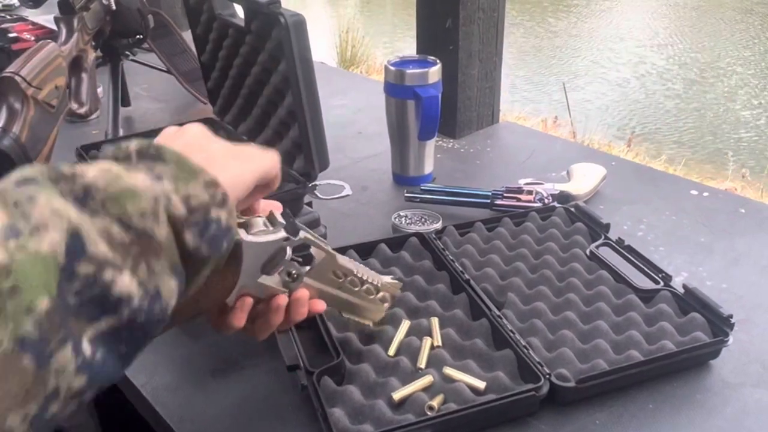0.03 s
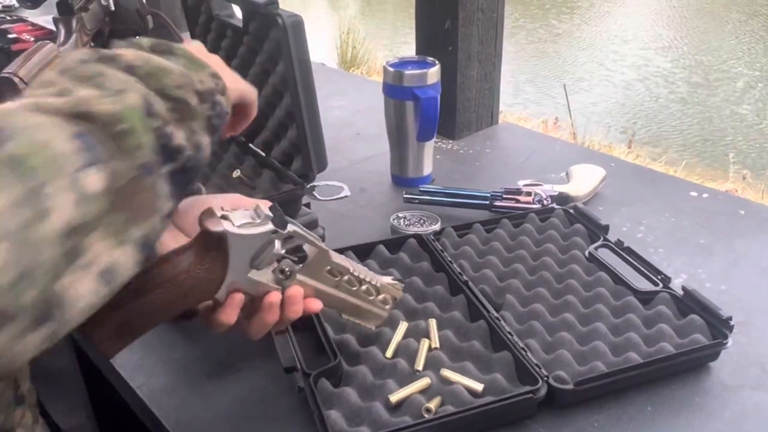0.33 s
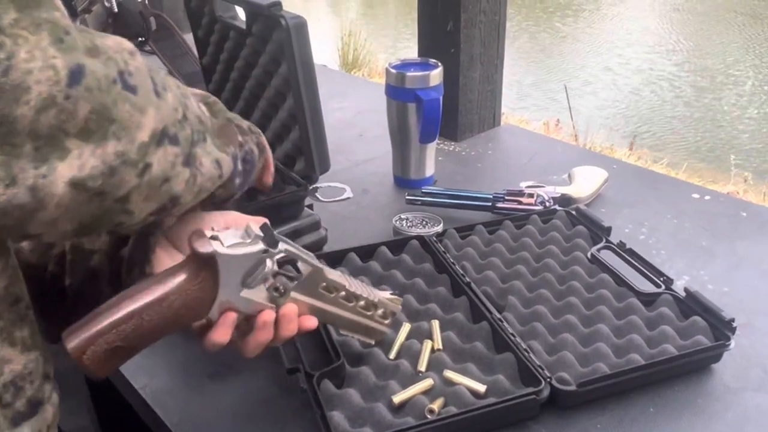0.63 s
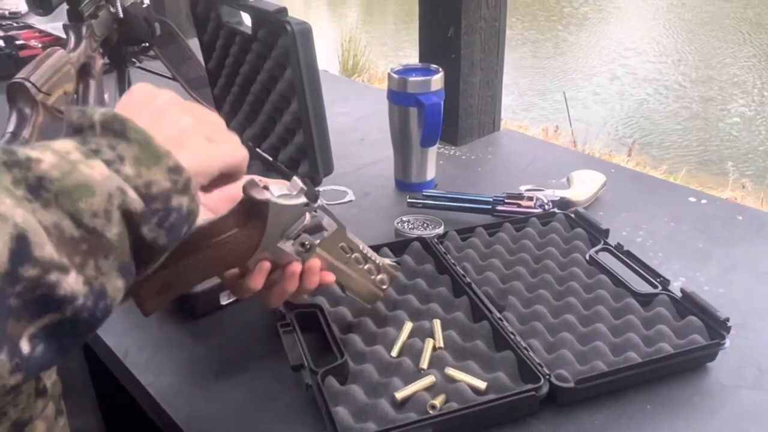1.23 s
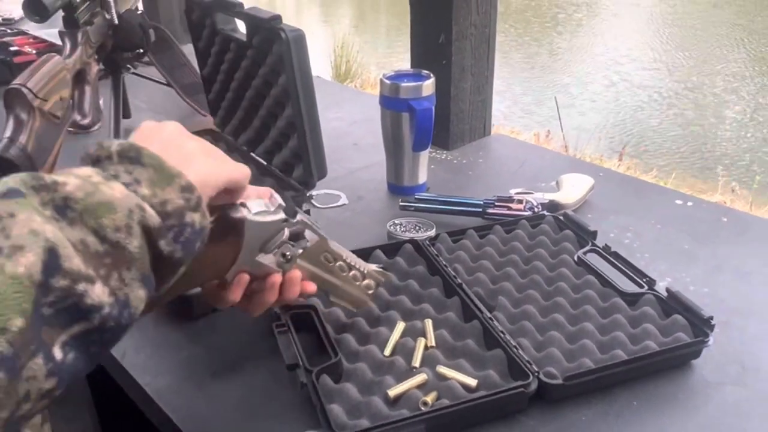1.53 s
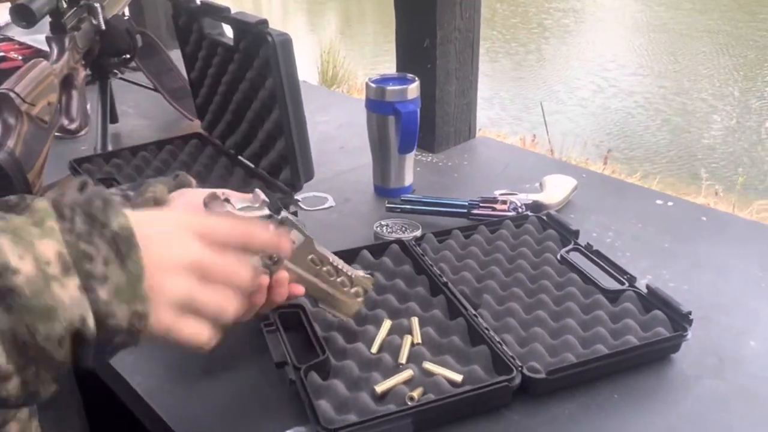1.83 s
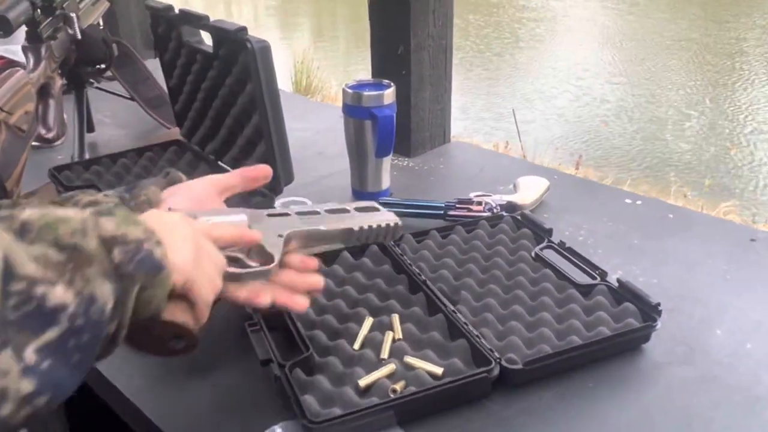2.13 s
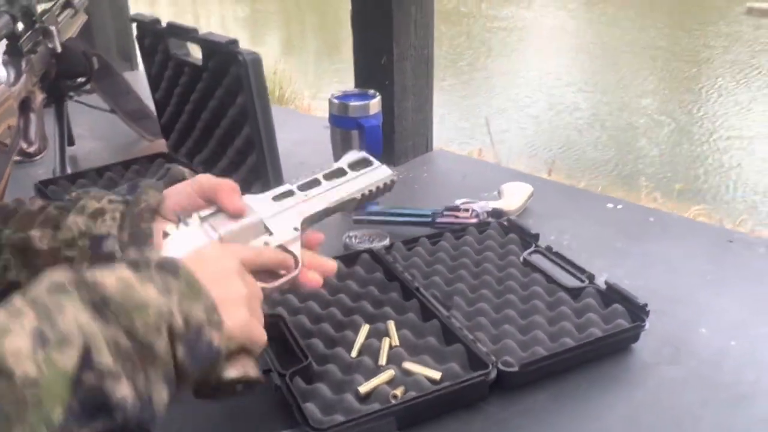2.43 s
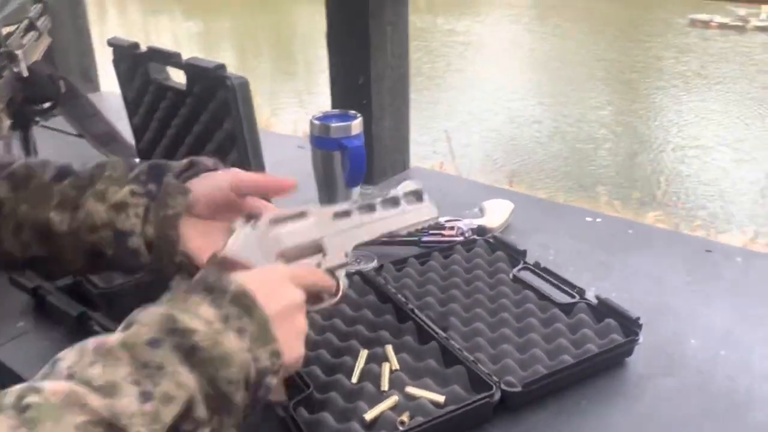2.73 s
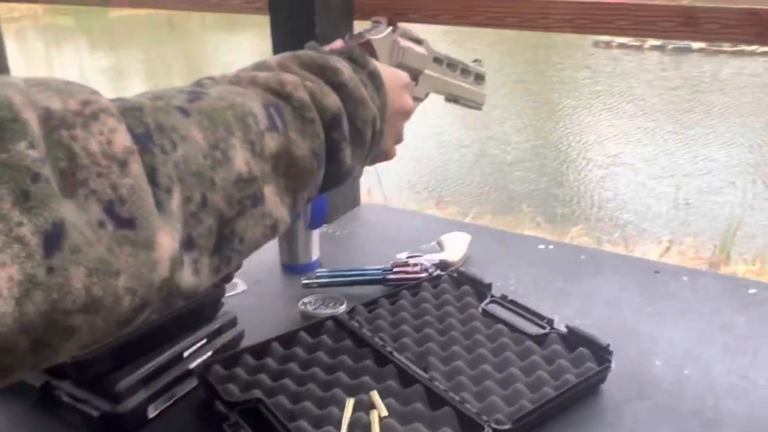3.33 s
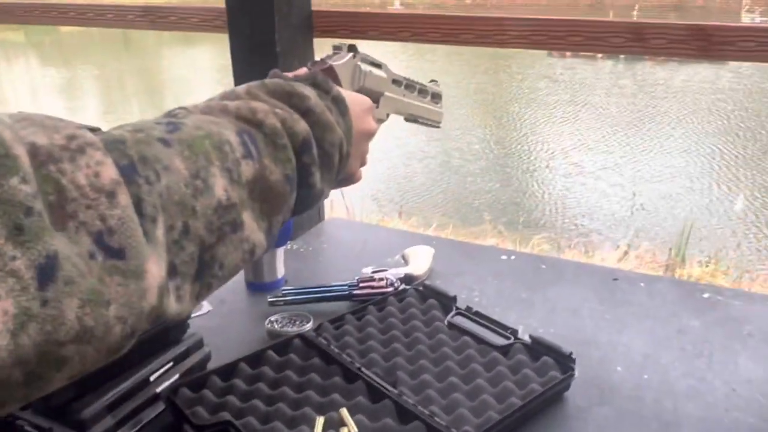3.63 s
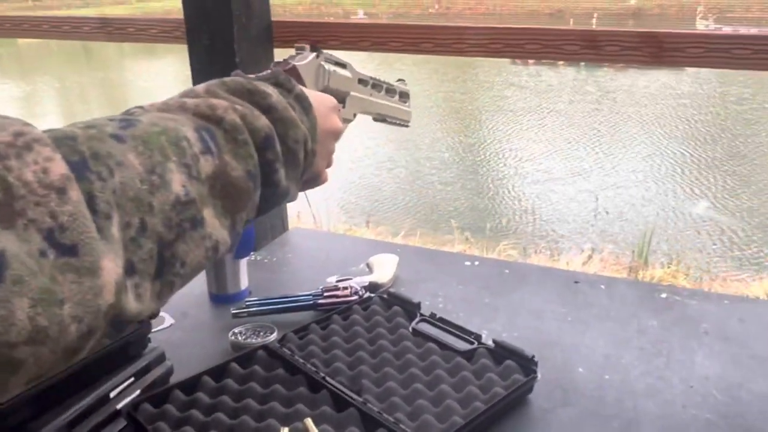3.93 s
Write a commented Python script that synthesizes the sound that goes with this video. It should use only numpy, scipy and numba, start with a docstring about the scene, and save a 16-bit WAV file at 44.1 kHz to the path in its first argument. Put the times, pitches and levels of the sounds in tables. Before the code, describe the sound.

A revolver-style air pistol is loaded, snapped shut, cocked and fired twice outdoors.

```python
"""Air pistol under a shelter

A revolver-style air pistol is loaded, snapped shut, cocked and fired twice at a bench under a roof by a pond.
Steel impacts excite the damped modes of shells and frame; each shot is a burst of gas with a low thump.
The shelter reverberates, sleeves rustle by friction, air rumbles faintly, and a limiter holds the shots down."""
import sys
import numpy as np
from scipy import signal
from scipy.fft import rfft, irfft, next_fast_len
from scipy.io import wavfile
from scipy.ndimage import uniform_filter1d, minimum_filter1d
from numba import njit

SR = 44100
rng = np.random.default_rng(int(sys.argv[2]) if len(sys.argv) > 2 else 0)


def wav_record(signal):
    """Record a signal, one row per channel, as 16-bit PCM in the file named by sys.argv[1]."""
    frames = np.transpose(np.atleast_2d(signal))
    bounded = np.clip(frames, -1, 1)
    # unit amplitude maps onto the largest positive 16-bit level
    quanta = np.round(bounded * 32767).astype(np.int16)
    wavfile.write(sys.argv[1], SR, quanta)


N = 176400
CONTACT_RISE_S, CONTACT_FALL_S = 0.00031, 0.0012
# sliding of sleeve and hand: t/s, level/dB, rise/s, decay/s
SLIDES = [(.66, -60, 0.0049, 0.13), (.8, -66, 0.096, 0.08), (1.62, -59.5, 0.026, 0.068),
          (1.8, -60.5, 0.11, 0.07), (2.92, -67.5, 0.048, 0.19)]
# shots: t/s, gas level/dB, burst length/s, gas bass/dB, thump level/dB, thump start f/Hz, lead-in swell/s
DISCHARGES = [(3.5531, -5.5, 0.00408, -0.5, -10.5, 412, 0.02),
              (3.8756, -2.5, 0.0014, -2.5, -23.5, 262, .004)]


def undb(db):
    """Amplitude ratio of a level in decibels."""
    return 10 ** (np.asarray(db) / 20)


def unit(x):
    """Normalisation to an rms of 1."""
    return x / np.sqrt(np.mean(x ** 2))


def colour(x, points):
    """Minimum-phase filter through (f/Hz, level/dB) points, made by folding the cepstrum."""
    size = next_fast_len(x.shape[-1] + 2048, True)
    size += size % 2
    hz, db = np.array(points, float).T
    log_hz = np.log(np.fft.rfftfreq(size, 1 / SR) + 1)
    cepstrum = irfft(np.log(undb(np.interp(log_hz, np.log(hz), db))))
    cepstrum[1:size // 2] *= 2
    cepstrum[size // 2 + 1:] = 0
    return irfft(rfft(x, size) * np.exp(rfft(cepstrum)))[..., :x.shape[-1]]


def envelope(t, rise, hold, fall):
    """Linear rise, hold and exponential decay."""
    return np.clip(t / rise, 0, 1) * np.exp(-np.maximum(t - rise - hold, 0) / fall)


def burst(shape):
    """Two uncorrelated noise transients, whitened under an envelope."""
    x = rng.standard_normal((2, len(shape))) * shape
    for _ in range(2):
        x = irfft(np.exp(1j * np.angle(rfft(x))), len(shape)) * np.sqrt(shape)
    return unit(x) * np.sqrt(np.mean(shape ** 2))


def add(out, x, at):
    """Superposition of x on out, starting at a time in seconds."""
    i = max(int(at * SR), 0)
    out[..., i:i + x.shape[-1]] += x[..., :N - i]


def spread(pair, width):
    """Sum and difference turn mid and side into left and right."""
    return pair[0] + width * pair[1] * np.array([[1], [-1]])


def walk(rate_hz):
    """Random modulation of rms 1, interpolated between independent values."""
    step = int(SR / rate_hz)
    stairs = np.repeat(rng.standard_normal(N // step + 1), step)
    return unit(uniform_filter1d(stairs, step)[:N])


def effort(rows):
    """Amplitude envelope of the hand's movements, a sum of strokes."""
    t = np.arange(N) / SR
    return sum(undb(db) * envelope(t - at, rise, 0, fall) for at, db, rise, fall in rows)


def friction(rows, tone, grain_db=2):
    """Sliding friction: noise whose amplitude follows the effort, with a random grain."""
    noise = unit(colour(rng.standard_normal((2, N)), tone))
    return noise * effort(rows) * undb(grain_db * walk(110))


def open_air(level_db=-46.5, swell_db=0.5):
    """Ambient noise: a gently swelling rumble, less coherent between the channels towards the treble."""
    # spectrum of the air: f/Hz, level/dB
    spectrum = [(18, -17), (45, -3.5), (85, 1), (200, -9), (450, -16), (1200, -31), (4000, -49.5),
                (10000, -60.5), (12000, -76)]
    # side relative to mid: f/Hz, level/dB
    width = [(150, -14), (1200, -1.5)]
    mid, side = unit(colour(rng.standard_normal((2, N)), spectrum))
    return spread([mid, colour(side, width)], 1) * undb(level_db + swell_db * walk(13))


def handling():
    """Friction of handling makes a low rumble, in mono."""
    # movements: t/s, level/dB, rise/s, decay/s
    movements = [(-.03, -41.5, 0.029, 0.18), (1.62, -43.5, 0.07, 0.17)]
    # spectrum of the rumble: f/Hz, level/dB
    spectrum = [(25, -21.5), (70, 0.5), (150, -22.5), (2000, -49)]
    return friction(movements, spectrum)[0]


def sleeves():
    """Friction of cloth gives broadband noise with a narrow scraping peak."""
    # spectrum of the cloth: f/Hz, level/dB
    spectrum = [(300, -6), (1500, 10.5), (4350, 3.5), (4650, 9.5), (4950, 2), (10000, 0.5), (11500, -15.5)]
    return friction(SLIDES, spectrum)


def shelter(x, low_t60=0.47, mid_t60=0.32, top_t60=0.45, far_t60=0.73, build_s=0.0064):
    """Reverberation by convolution: roof reflection, scatter from posts and benches, a faint far tail."""
    # spectrum of the reverberation: f/Hz, level/dB
    spectrum = [(100, 4), (500, -12), (2500, -3), (5500, -3), (10000, -7), (12000, -16.5)]
    t = np.arange(SR) / SR
    fade = lambda t60: np.exp(-np.log(1000) * t / t60)
    noise = rng.standard_normal((2, SR))
    low, below_top = (signal.sosfilt(signal.butter(2, hz, fs=SR, output="sos"), noise)
                      for hz in (900, 10000))
    near = low * fade(low_t60) + (below_top - low) * fade(mid_t60) + (noise - below_top) * fade(top_t60)
    far = colour(rng.standard_normal((2, SR)), [(1500, -3.5), (15000, -11.5)]) * fade(far_t60)
    diffuse = (unit(near) + undb(-8.5) * unit(far)) * (1 - np.exp(-(t / build_s) ** 2))
    roof = undb(-9) * unit(burst(envelope(t - 0.015, 0.00079, 0, 0.0026)))  # arrives after 15 ms
    response = colour(diffuse + roof, spectrum) / np.sqrt(SR)
    return signal.fftconvolve(x[:1], response, axes=1)[:, :N]


def rattles(ticks_per_s=20, band_hz=(2800, 6500), relative_db=-15):
    """Loose parts tick as a Poisson process, as strongly as the hand moves."""
    ticks = (rng.random(N) < ticks_per_s / SR) * rng.random(N)
    decays = signal.lfilter([1], [1, -np.exp(-1 / (2 * CONTACT_FALL_S * SR))], ticks)
    bandpass = signal.butter(2, band_hz, "band", fs=SR, output="sos")
    steel = signal.sosfilt(bandpass, rng.standard_normal((2, N)) * decays)
    return undb(relative_db) * unit(steel) * effort(SLIDES)


def uneven(x, step_hz=380, above_hz=900):
    """Each blow excites the gun's broad resonances unequally: a random spectral ripple."""
    hz = np.arange(2, 44) * step_hz
    db = 3 * np.clip(rng.standard_normal(len(hz)), -1.5, 1.5)
    ripple = (db - uniform_filter1d(db, size=5)) * (hz > above_hz)
    return colour(x, np.column_stack([hz, ripple]))


def contacts(events, modes, detune=0.0056, ring_offset_db=-19.5):
    """Impact excitation: metal chatters, dies in a damped clatter and leaves close mode pairs beating."""
    out, t = np.zeros((2, N)), np.arange(SR // 3) / SR
    # bass of a contact: f/Hz, level/dB
    bass = [(450, -21.5)]
    hz, mode_db, t60 = np.array(modes + modes).T[:, :, None]
    for at, db, body_db, edge_db, top_db, ring_db, length in events:
        pitch = hz * (1 + detune * rng.standard_normal(hz.shape))
        poles = 2j * np.pi * pitch - np.log(1000) / t60
        rings = undb(mode_db + ring_db + ring_offset_db) * np.exp(poles * t)
        phasors = np.exp(2j * np.pi * rng.random((2, len(hz))))
        hit = (phasors @ rings).imag * np.minimum(t / CONTACT_RISE_S, 1)
        chatter = burst(envelope(t[:SR // 20], CONTACT_RISE_S, length, CONTACT_FALL_S))
        clatter = undb(-10) * burst(envelope(t[:SR // 10], length, 0, fall=0.011))
        add(hit, chatter, 0)
        add(hit, clatter, 0)
        tone = bass + [(1100, body_db), (1700, body_db), (2500, body_db - 2.5), (3200, 0), (6000, 0),
                       (8500, edge_db), (11500, (edge_db + top_db) / 2 - 3), (15000, top_db)]
        add(out, undb(db) * colour(uneven(hit), tone), at)
    return out


def shells():
    """Shells set into the cylinder ring in free vibration after each impact."""
    # impacts: t/s, level/dB, body/dB, edge/dB, top/dB, ring/dB, length/s
    impacts = [(.069, -31.5, -21, -3.5, 1, -9, .004), (.094, -40, -11, -20, -24, -10, 0.01),
               (.1295, -29, 1.5, 0, 6, -1.5, 0.0029), (.1805, -38, -0.5, 2, -22, -25, 0.0033),
               (1.437, -38, -0.5, -13, -12.5, 4, .009), (1.560, -47, 5, -16.5, -24, -7.5, .0015),
               (1.6125, -35.5, -7, -2, -21, -12, .002), (1.7145, -32, 5, 6, -6, -1, 0.0016)]
    # modes of the shells: f/Hz, level/dB, T60/s
    modes = [(3730, -4, 0.23), (3800, -1, 0.21), (5400, -13.5, .17), (6335, -12, .16), (7870, 8.5, 0.13),
             (9990, 1, 0.14), (15120, 3.5, .2)]
    return contacts(impacts, modes)


def lockwork():
    """Impacts of cylinder, latch, trigger and hammer excite the gun's natural modes."""
    # impacts: t/s, level/dB, body/dB, edge/dB, top/dB, ring/dB, length/s
    impacts = [(2.033, -30.5, -1.5, -13, -21, -7, 0.0024), (2.0543, -19, -1.5, -2, -8, -5, 0.0066),
               (2.070, -19, -7, 11.5, -5, -5, 0.00083), (2.081, -16.5, -15, -3, -15, -6, 0.0013),
               (2.1028, -6.5, -3.5, -3, -8, 1.5, 0.0023), (2.436, -39.5, -6, -29, -23, -17, 0.00048),
               (2.4800, -26, -10, 4.5, 1.5, -6, 0.0045), (2.4838, -26, -5, -25, -19, -5, 0.0052),
               (2.636, -44, 5, -3, -21, -18, 0.002), (2.657, -46.5, 4, 7, -21.5, -20, 0.002),
               (3.4715, -29, -6, 7.5, 4, -7, 0.0037), (3.4908, -22, -6.5, -2, 1.5, -13, 0.0063),
               (3.501, -28.5, -8, -2, -6, -32, 0.014), (3.8062, -25, -4, 8, 10, -10, 0.0014),
               (3.8268, -20, -5.5, 1.5, -2, -13, 0.007)]
    # modes of cylinder and frame: f/Hz, level/dB, T60/s
    modes = [(1583, -2.5, 0.14), (1646, 6, 0.06), (3850, -17, .23), (4950, -13.5, 0.19), (7960, -2, 0.15),
             (8560, -6.5, 0.12), (9980, 5, 0.087), (10280, 10, 0.093), (15120, -8, .18)]
    return contacts(impacts, modes)


def thumps(end_hz=55.3, glide_s=0.00582, lag_s=0.00581, drone_hz=47.1):
    """Damped sinusoids of falling pitch mark a knock and the shots; a drone follows the first shot."""
    # dull knock of the hand: t/s, level/dB, start f/Hz
    knocks = [(0.399, -25, 174)]
    shot_pulses = [(at + lag_s, db, hz) for at, _, _, _, db, hz, _ in DISCHARGES]
    out, t = np.zeros(N), np.arange(N) / SR
    pulse = envelope(t, rise=0.0032, hold=0.0116, fall=0.0063)
    for at, db, start_hz in knocks + shot_pulses:
        hz = end_hz + (start_hz - end_hz) * np.exp(-t / glide_s)
        add(out, undb(db) * np.sin(2 * np.pi * np.cumsum(hz) / SR) * pulse, at)
    drone = np.sin(2 * np.pi * drone_hz * t) * envelope(t, rise=0.13, hold=0.13, fall=0.043)
    add(out, undb(-28.5) * drone, at=3.58)
    return out


def shots(rise_s=0.00046, fall_s=0.0023, swell_db=-14.5):
    """A faint noise swells just before each shot, then gas expands from the valve as a noise transient."""
    # spectrum of the discharge: f/Hz, level/dB
    spectrum = [(60, 2), (300, 5.5), (480, 3.5), (700, 8), (1150, -4.5), (1560, 4), (2700, -3.5),
                (3050, -3.5), (3750, -3), (5400, 4), (6900, -0.5), (8400, 2.5), (10500, -3.5),
                (15500, -6.5)]
    out, t = np.zeros((2, N)), np.arange(SR // 10) / SR
    for at, db, length, bass_db, _, _, swell_s in DISCHARGES:
        gas = uneven(burst(envelope(t, rise_s, length, fall_s)))
        add(out, undb(db) * colour(gas, [(650, bass_db), (1200, 0)]), at)
        swell = burst(envelope(t, swell_s, 0, fall_s))
        add(out, undb(db + swell_db) * swell, at - swell_s)
    return colour(out, spectrum)


def scene():
    """Direct sound of the gun, close and a little to the left, adds to the diffuse field and open air."""
    # side relative to mid in the diffuse field: f/Hz, level/dB
    diffuse_width = [(250, -8), (1200, 0), (6500, -1.5), (8500, -23)]
    steel = shells() + lockwork() + rattles()
    gas = shots()
    direct = spread(steel + gas, width=0.25)
    mid, side = shelter(undb(-5) * steel + undb(1) * gas) + sleeves()
    diffuse = spread([mid, colour(side, diffuse_width)], width=0.86)
    balance = undb([[1], [-1]])
    return (direct + diffuse) * balance + thumps() + handling() + open_air()


def ports(x):
    """Treble resonance of the two microphone ports shifts the phase between left and right."""
    # lead of the left port over the right: f/Hz, phase/rad
    phase_lead = [(100, 0), (1300, .8), (2800, 1), (8300, .1), (11800, -6.2), (12600, -6.9), (14900, -12.4)]
    # response of the ports: f/Hz, level/dB
    response = [(9400, -3.5), (10250, -4), (11300, -8), (13000, -6.5), (14500, -6.5), (15500, 4.5),
                (16200, -16)]
    size = 2 * N
    lead = np.interp(np.fft.rfftfreq(size, 1 / SR), *np.array(phase_lead).T)
    turn = np.exp(1j * np.array([lead, 0 * lead]))
    return irfft(rfft(colour(x, response), size) * turn)[:, :N]


@njit
def follow(size, keep):
    """Peak detection with instant attack and exponential release."""
    out, peak = np.empty(len(size)), 0.
    for i in range(len(size)):
        peak = max(size[i], peak * keep)
        out[i] = peak
    return out


def record(dry, limit_db=-2.66, release_s=0.0093, cutoff_hz=16100):
    """Peak limiting and low-pass filtering follow the microphone ports."""
    x = ports(dry)
    peak = follow(np.abs(x).max(axis=0), np.exp(-1 / (release_s * SR)))
    gain = np.minimum(1, undb(limit_db) / (peak + 1e-9))
    gain = uniform_filter1d(minimum_filter1d(gain, size=44), size=44)  # held and smoothed over 1 ms
    lowpass = signal.ellip(8, .2, 70, cutoff_hz, fs=SR, output="sos")
    return signal.sosfilt(lowpass, x * gain)


dry = scene()
out = record(dry)
wav_record(out)
```